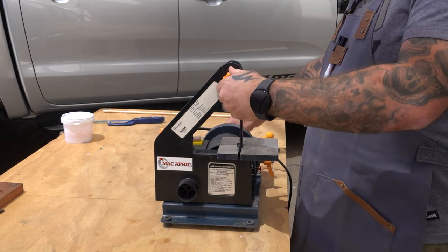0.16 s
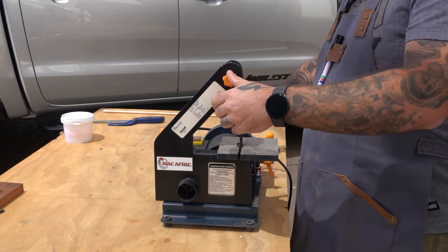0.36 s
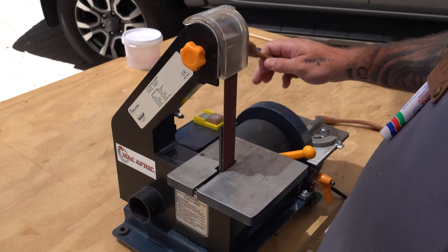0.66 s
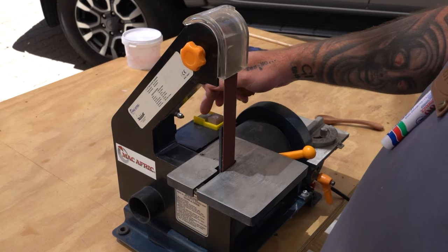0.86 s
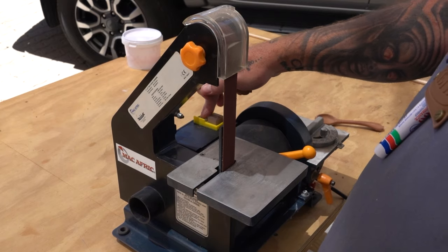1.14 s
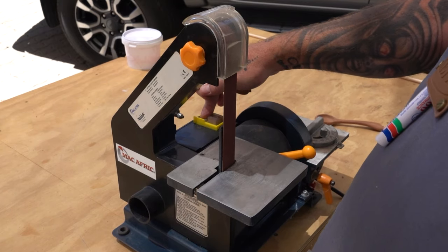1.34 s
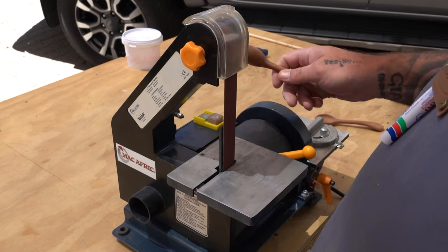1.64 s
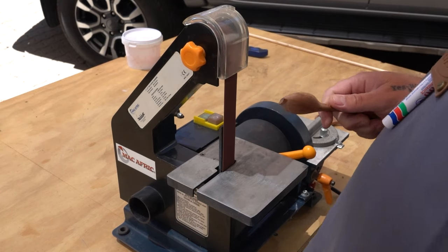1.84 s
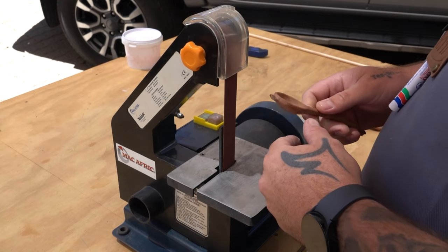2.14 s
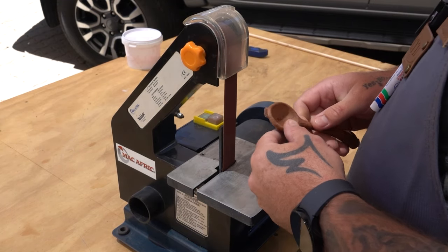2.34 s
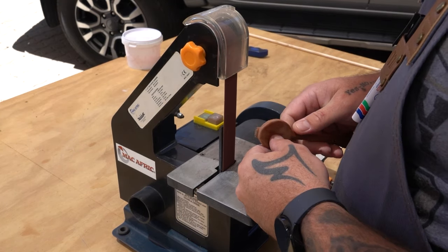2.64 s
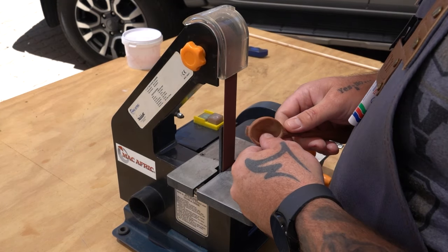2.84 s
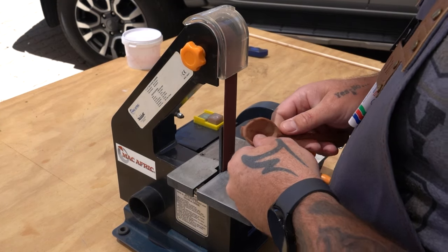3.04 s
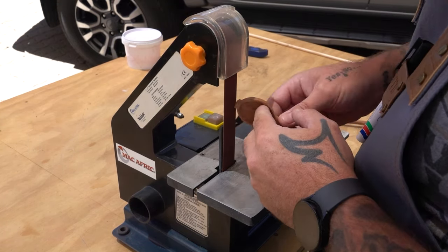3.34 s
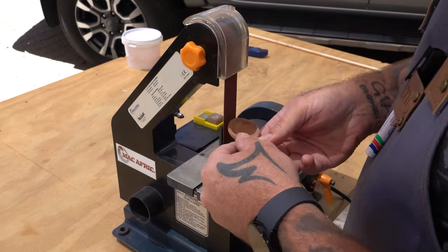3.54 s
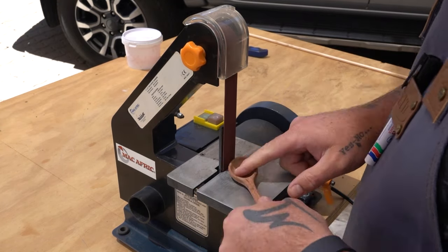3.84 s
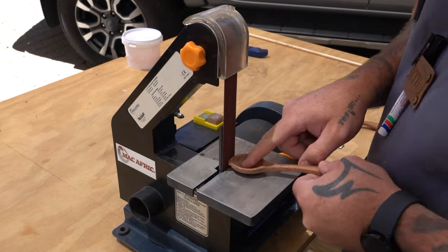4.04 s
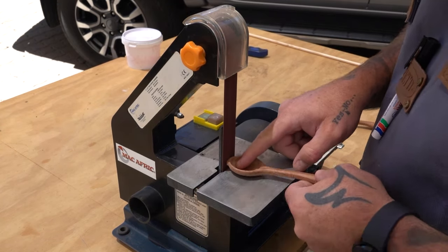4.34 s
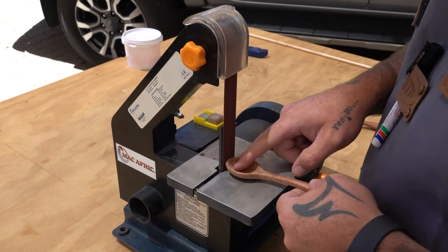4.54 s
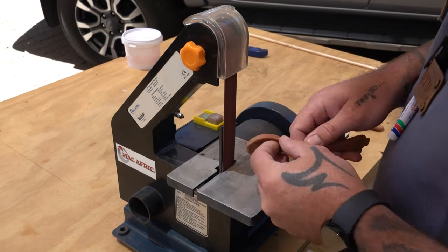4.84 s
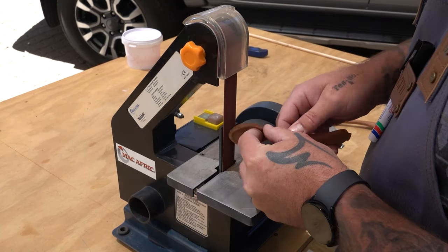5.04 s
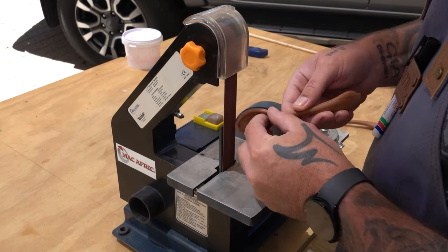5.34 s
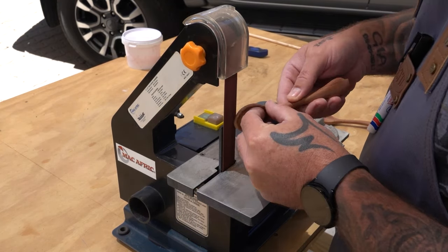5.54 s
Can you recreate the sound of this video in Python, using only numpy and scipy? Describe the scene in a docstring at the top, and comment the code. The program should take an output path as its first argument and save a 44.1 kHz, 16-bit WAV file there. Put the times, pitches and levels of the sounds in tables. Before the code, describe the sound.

A small belt sander bumps down outdoors, clicks on and runs up to a rattling hum, then jumps to a shrill fast-forward whistle with scuffing puffs.

```python
"""A swell of wind and a thin squeak in open air, then a small belt sander knocks on a wooden bench (ringing modes).
After a cut its switch clicks (resonated impulses) and it runs up: the belt joint thumps once a lap, the belt
hisses over its wheels (modulated noise) and the motor hums (sines). After a second cut all sounds as if run
twenty times fast: the hum is a high whine, and slow gusts of wind are short scuffing puffs of noise."""
import sys
import numpy as np
from scipy import signal
from scipy.fft import rfft, irfft, next_fast_len
from scipy.io import wavfile
from scipy.ndimage import map_coordinates

SR = 44100
rng = np.random.default_rng(int(sys.argv[2]) if len(sys.argv) > 2 else 0)


def wav_out(sig):
    """Save sig, one row per channel (or a flat mono array), as 16-bit PCM at SR to the path in sys.argv[1]."""
    wavfile.write(sys.argv[1], SR, np.round(np.clip(np.atleast_2d(sig).T, -1, 1) * 32767).astype(np.int16))


N = 250471

# the change of listening place, then the start of the fast-forward: time [s]
CUT_TIMES = [0.694, 3.0975]


def amp(db):
    """Decibels to amplitude gain: 20 dB is a factor of ten."""
    return 10 ** (np.asarray(db) / 20)


def unit(x):
    """Normalisation of x to an rms of 1."""
    return x / np.sqrt(np.mean(x ** 2) + 1e-20)


def clock():
    """Sampled time: the instant of every sample [s]."""
    return np.arange(N) / SR


def curves(rows):
    """Linear interpolation in time of each column after the first."""
    times, *columns = np.transpose(rows)
    return [np.interp(clock(), times, column) for column in columns]


def wobble(rate):
    """Slow random modulation: a spline through random knots, rate knots a second."""
    knots = rng.standard_normal(int(N * rate / SR) + 4)
    return map_coordinates(knots, [np.arange(N) * rate / SR])


def between(start, end, edge):
    """A gate open from start to end, with linear slopes edge seconds long."""
    return np.clip(np.minimum(clock() - start, end - clock()) / edge + .5, 0, 1)


def filtered(x, response):
    """Linear filtering: the spectrum of x times a complex response of frequency."""
    m = next_fast_len(N + SR // 2)
    return irfft(rfft(x, m) * response(np.fft.rfftfreq(m, 1 / SR)), m)[:N]


def coloured(x, spectrum):
    """Spectral shaping of x by (frequency [Hz], level [dB]) points, at rms 1."""
    f, db = np.transpose(spectrum)
    return unit(filtered(x, lambda hz: amp(np.interp(np.log(hz + 1), np.log(f + 1), db))))


def noise(spectrum):
    """Gaussian noise shaped to a spectrum, at rms 1."""
    return coloured(rng.standard_normal(N), spectrum)


def resonate(x, peaks):
    """Parallel second-order resonances of alternating sign: (centre [Hz], width [Hz], level [dB])."""
    def response(f):
        total = 0
        for k, (centre, width, db) in enumerate(peaks):
            damping = 1j * f * width
            total = total + (-1) ** k * amp(db) * damping / (centre * centre - f * f + damping)
        return total
    return filtered(x, response)


def dull(x, corner_hz):
    """Second-order low-pass: the treble of x rolls off above the corner."""
    return filtered(x, lambda f: 1 / (1 + 1j * np.sqrt(2) * f / corner_hz - (f / corner_hz) ** 2))


def fade(s, t60):
    """Exponential decay from time s, by 60 dB in t60 seconds."""
    age = clock() - s
    return (age >= 0) * amp(-60 * np.clip(age / t60, 0, 3))


def tone(hz):
    """Phase integration: a sine that follows a frequency curve."""
    return np.sin(2 * np.pi * (np.cumsum(hz * np.ones(N)) / SR + rng.random()))


def sander():
    """Periodic excitation: the belt drums on the frame, thumps at its joint and hisses over the wheels."""
    lap_hz, shaft_hz, idler_hz, mains_hz = 18.91, 46.7, 57.3, 50.1  # all but the mains at full speed
    start_s, run_up_s = 1.269, 0.49
    joint_at_s = 1.8235  # one pass of the belt joint
    rattle_full_db, rattle_growth_db = -35.5, 25.5  # gain at full speed, and its rise from standstill
    hiss_full_db, hiss_growth_db = -39.5, 37.5
    slow_hiss_hz = 5800  # the hiss of a slow belt rolls off above this
    whirr_db = -62.5  # the same at any speed
    # belt and shaft orders at full speed: (frequency [Hz], relative level [dB])
    order_lines = [(280, -59.5), (373, -61), (474, -46.5), (559.8, -45.5), (603, -50), (652.5, -63),
                   (682, -51), (700.4, -51.5), (719.4, -53.5), (757.5, -45), (814.5, -43), (833.5, -42.5),
                   (1003.5, -57), (1022.6, -45), (1060.5, -63)]
    # mains harmonics: (multiple of the mains [1], relative level [dB])
    hum_lines = [(2, -60), (4, -56.5)]
    # belt drumming on the frame: (frequency [Hz], relative density [dB per Hz])
    rattle_spectrum = [(70, -43), (160, -29), (240, -19.5), (300, -9.5), (400, -4), (470, 1.5), (720, -3.5),
                       (830, 3), (910, -5), (1000, -2.5), (1130, -17.5), (1270, -6.5), (1450, -12.5),
                       (1750, -8.5), (2300, -17.5), (4000, -64)]
    # belt grit: (frequency [Hz], relative density [dB per Hz])
    hiss_spectrum = [(900, -5), (1300, -3.5), (2200, -7), (3000, 3), (3300, -1.5), (4200, 0), (5600, -2.5),
                     (8200, -0.5), (9300, -5), (10300, -12), (11500, -8.5), (13000, -7), (14200, -12),
                     (15500, -17)]
    # resonances of guard and platen: (centre [Hz], width [Hz], relative level [dB])
    guard_peaks = [(1740, 470, -2.5), (2570, 97, 5), (2980, 104, 0.5), (3745, 34, 4), (4090, 180, 1),
                   (4927, 50, 7), (6730, 77, 0.5), (7800, 320, -4.5)]
    # resonances of the motor's casing: (centre [Hz], width [Hz], relative level [dB])
    casing_peaks = [(1780, 160, -2.5), (850, 180, -2)]

    speed = np.sin(np.pi / 2 * np.clip((clock() - start_s) / run_up_s, 0, 1))  # share of full speed
    rattle_db = rattle_full_db - rattle_growth_db * (1 - speed)
    hiss_db = hiss_full_db - hiss_growth_db * (1 - speed)
    travel = np.cumsum(speed) / SR
    travel -= np.interp(joint_at_s, clock(), travel)  # seconds of full-speed running since that pass
    lap = travel * lap_hz % 1

    # the belt's own unevenness comes round again on every lap
    surface = rng.standard_normal(int(SR / lap_hz))
    repeating = surface[(lap * len(surface)).astype(int) % len(surface)]
    flap = 1 + 0.16 * np.cos(2 * np.pi * (lap - .2))
    drive = (rng.standard_normal(N) + 0.52 * repeating) * flap * amp(2.3 * wobble(130))
    drumming = amp(-4.5 + 4.2 * (1.5 - speed)) * coloured(drive, rattle_spectrum)

    # the thick joint slaps the platen once a lap, some laps harder than others
    age = lap / lap_hz
    slap = age / .0015 * np.exp(1 - age / .0015) * np.sin(2 * np.pi * 660 * age)
    joint = 1.9 * speed ** 4 * amp(2 * wobble(19)) * slap

    # clear orders and hum only build up near full speed
    sway = speed * (1 + 0.00089 * wobble(4.9))
    orders = sum(amp(db + 37.0 + 0.75 * wobble(6.2)) * tone(hz * sway) for hz, db in order_lines)
    orders = flap * speed ** 8 * orders
    hum = speed ** 6 * sum(amp(db + 5.5 + 1.7 * wobble(14)) * tone(k * mains_hz) for k, db in hum_lines)

    # the idler wheel presses the belt once a turn; shaft and lap modulate the rub too
    idler_db = 1.22 * np.cos(2 * np.pi * idler_hz * travel)
    shaft_db = 0.27 * np.cos(2 * np.pi * shaft_hz * travel)
    lap_db = 0.44 * np.cos(2 * np.pi * lap)
    rub = amp(idler_db + shaft_db + lap_db + 0.75 * wobble(24.89))
    guard = unit(resonate(rng.standard_normal(N) + 0.59 * repeating, guard_peaks))
    slow_grit = dull(noise(hiss_spectrum), slow_hiss_hz)
    grit = speed ** 2 * noise(hiss_spectrum) + (1 - speed ** 2) * slow_grit
    hiss = rub * (amp(-1) * grit + amp(-6.0) * speed ** 3 * guard)

    whirr = amp(whirr_db) * unit(resonate(rng.standard_normal(N), casing_peaks))
    rattle = amp(rattle_db) * (drumming + joint + orders)
    return between(1.335, 9, edge=0.075) * (whirr + rattle + amp(hiss_db) * hiss + hum)


def fast_sander():
    """Frequency scaling: the sped-up hum is a whistle, the rattle a fizz with wavering rotation orders."""
    mains_hz, lap_hz, shaft_hz, rotor_hz = 1002, 379.45, 935.25, 989.4  # sped-up rates
    beat_hz = 174  # spacing of the side lines from each shaft line
    fizz_db, fizz_sag_db_per_s = -42.5, 0.03
    # mains harmonics: (multiple of the sped-up mains [1], relative level [dB])
    hum_lines = [(1, -75.5), (2, -63), (3, -78.5), (4, -58), (6, -83), (8, -63), (10, -64)]
    # drift of the machine's speed: (time [s], speed ratio [1])
    speed_drift = [(3.1, 0.9995), (3.6, 1.0001), (3.8, 0.9988), (4.4, 0.9992), (4.7, 1.0007),
                   (5.68, 1.0007)]
    # outline over the lap-rate multiples: (frequency [Hz], relative level of one line [dB])
    belt_outline = [(3400, -79), (4200, -85), (5000, -81), (5700, -71.5), (7200, -71), (8700, -67.5),
                    (11000, -63.5), (12300, -72), (13000, -58), (14000, -59), (14800, -64), (15200, -64),
                    (15600, -64)]
    # beating shaft lines: (multiple of the shaft rate [1], relative level [dB], lower side line [dB],
    # upper side line [dB])
    shaft_lines = [(2, -71.5, -104, -89), (4, -75, -95, -88), (6, -67, -87, -65.5), (8, -62, -77.5, -62),
                   (10, -57.5, -62, -65), (12, -55, -61.5, -61), (14, -59, -73, -67), (16, -59, -74, -67)]
    # rotor lines: (multiple of the rotor rate [1], relative level [dB])
    rotor_lines = [(3, -84), (4, -74), (8, -72), (16, -67)]
    # sped-up rattle: (frequency [Hz], relative density [dB per Hz])
    fizz_spectrum = [(300, -38.5), (1500, -24), (2600, -23), (3300, -26.5), (3500, -17), (4400, -17),
                     (5200, -22.5), (6800, -9.5), (7350, -11), (8000, -7.5), (9300, 1.5), (9650, -4),
                     (10300, -0.5), (11200, -1.5), (12500, -2.5), (13800, -5), (14200, -6), (15000, -3),
                     (15600, -0.5)]

    speed = curves(speed_drift)[0] * (1 + .0003 * wobble(14) + .0004 * wobble(150))
    hum = sum(amp(db + 3.0 + 0.49 * wobble(12)) * tone(mains_hz * k) for k, db in hum_lines)
    belt_hz = lap_hz * np.arange(9, 42)
    lines = list(zip(belt_hz, np.interp(belt_hz, *np.transpose(belt_outline))))
    for k, *levels in shaft_lines:
        for side, db in zip((0, -1, 1), levels):
            lines.append((k * shaft_hz + side * beat_hz, db))
    lines += [(k * rotor_hz, db) for k, db in rotor_lines]
    whine = sum(amp(db + 2.0 + 0.99 * wobble(2.96)) * tone(hz * speed) for hz, db in lines)
    sag_db = fizz_sag_db_per_s * (clock() - CUT_TIMES[1])
    fizz = amp(fizz_db - sag_db + 0.65 * wobble(60)) * noise(fizz_spectrum)
    return hum + whine + fizz


def switch():
    """Impact excitation: the plastic rocker snaps over, bounces and thuds into the housing."""
    # snap and bounces: (time [s], relative click level [dB], relative thud level [dB])
    click_times = [(1.297, -47, -51), (1.3064, -46, -29), (1.310, -62, -35), (1.3152, -59, -28),
                   (1.331, -74, -34), (1.386, -63, -70)]
    # resonances of the rocker: (centre [Hz], width [Hz], relative level [dB])
    rocker_peaks = [(1800, 300, -1.5), (2600, 420, -7), (3660, 530, 2), (5200, 1700, -8.5), (7350, 960, 0),
                    (8270, 500, 1), (12600, 2600, -24)]
    # resonances of the housing: (centre [Hz], width [Hz], relative level [dB])
    housing_peaks = [(207, 18, -10), (340, 24, -19.5), (403, 80, 2.5), (524, 106, -2), (834, 180, -7),
                     (1540, 74, -9), (1780, 100, -17)]
    snaps, thuds = np.zeros(N), np.zeros(N)
    for s, click_db, thud_db in click_times:
        snaps += amp(click_db) * (fade(s, 0.0082) + amp(-12.0) * fade(s, 0.07))
        thuds[round(s * SR)] = amp(thud_db + 34.5)
    clicks = amp(9.5) * resonate(snaps * rng.standard_normal(N), rocker_peaks)
    return clicks + dull(resonate(thuds, housing_peaks), corner_hz=4500)


def knocks():
    """Modal ringing: each bump is one short, dull push, then the frame and the bench ring."""
    # the sander bumps on the bench: (time [s], relative level [dB])
    bumps = [(0.397, -40), (0.409, -43), (0.6001, -21.5), (0.6093, -51)]
    # modes of the sander on its bench: (frequency [Hz], relative level [dB], t60 [s])
    frame_modes = [(382.5, -15, 0.51), (462, -7.5, 0.23), (636, 2.5, 0.11), (780, -15.5, 0.14),
                   (900, -15, .2), (963, -1, 0.13), (1050, -19, .13), (1370, 3, 0.033), (1550, -6, 0.12),
                   (2200, -14, 0.076)]
    bench_spectrum = [(80, -18), (250, -2), (400, 14), (1600, -1), (2300, -14), (8000, -34)]  # Hz, dB
    out, t = np.zeros(N), clock()
    for s, db in bumps:
        age = np.maximum(t - s, 0)
        ring = np.zeros(N)
        for hz, level, t60 in frame_modes:
            ring += amp(level + rng.normal(0, 1)) * fade(s, t60) * np.sin(2 * np.pi * hz * age)
        contact = (t - s - .0005) / .00022
        push = -contact * np.exp(-contact ** 2 / 2)
        bench = fade(s, 0.16) * noise(bench_spectrum)
        out += amp(db) * (amp(-12) * ring + amp(3.5) * push + amp(-11) * bench)
    band = signal.butter(3, [230, 2600], "bandpass", fs=SR, output="sos")
    return signal.sosfilt(band, out) * between(-1, CUT_TIMES[0], edge=.001)


def fingers():
    """Light friction: tiny bright ticks of decaying noise as fingers brush the housing."""
    # brushes: (time [s], level [dB])
    brushes = [(0.957, -69), (0.99, -64), (1.249, -67.5)]
    # their colour: (frequency [Hz], relative density [dB per Hz])
    tick_spectrum = [(1000, -6), (2000, 9), (8000, -2), (13000, -8), (15500, -10)]
    return sum(amp(db) * fade(s, 0.018) for s, db in brushes) * noise(tick_spectrum)


def fast_wind():
    """Time compression: sped-up gusts are puffs over a breeze, each its own mix of low thump and higher scuff."""
    breeze_scuff_db = -14  # the breeze's scuff relative to its thump, before the final mix
    edge_share, tail_db, tail_t60_s = 0.18, -17.5, 0.24  # slopes as a share of the gust; its wake
    # sped-up breeze between the gusts: (time [s], relative level [dB])
    breeze = [(3.1, -66), (3.43, -82), (3.57, -60.5), (3.86, -65.5), (3.96, -87), (4.09, -85), (4.17, -62),
              (5.03, -65), (5.68, -48.5)]
    # sped-up gusts: (start [s], length [s], relative thump level [dB], relative scuff level [dB])
    gust_times = [(3.273, 0.076, -63.5, -75), (3.626, 0.1, -57, -60), (4.113, 0.024, -50.5, -70),
                  (4.299, 0.073, -56, -76), (4.385, 0.011, -48, -54), (4.553, 0.014, -37, -48),
                  (4.568, 0.006, -27.5, -38), (4.611, 0.058, -48.5, -61), (4.662, 0.019, -31.5, -48.5),
                  (4.697, 0.073, -38, -48), (4.925, 0.021, -45.5, -69), (4.955, 0.011, -36, -53),
                  (5.08, 0.027, -45, -60), (5.154, 0.066, -44, -55), (5.239, 0.13, -49.5, -54.5),
                  (5.381, 0.09, -39, -45.5), (5.423, 0.017, -44.5, -43), (5.499, 0.029, -43, -52.5),
                  (5.589, 0.024, -37.5, -53.5), (5.615, 0.059, -47, -54.5), (5.637, 0.00595, -36, -44)]
    # low puff: (frequency [Hz], relative density [dB per Hz])
    thump_spectrum = [(25, -59), (60, -5.5), (110, 0.5), (180, 2.5), (350, -2), (550, -8), (750, -25.5),
                      (1300, -45.5)]
    # higher scuff: (frequency [Hz], relative density [dB per Hz])
    scuff_spectrum = [(350, -9), (680, 3), (1000, -4.5), (1500, -13), (2200, -18.5), (3500, -35),
                      (7000, -60)]
    thump = amp(curves(breeze)[0] + 2.5 * wobble(35))
    scuff = amp(breeze_scuff_db) * thump
    for start, length, thump_db, scuff_db in gust_times:
        end = start + length
        gust = between(start, end, edge=edge_share * length)
        thump += amp(thump_db) * (gust + amp(tail_db) * fade(end, tail_t60_s))
        scuff += amp(scuff_db) * gust
    eddies = unit(amp(3.2 * wobble(200)))
    puffs = eddies * (amp(-1.1) * thump * noise(thump_spectrum) + amp(-1.54) * scuff * noise(scuff_spectrum))
    return signal.sosfilt(signal.butter(3, 70, "highpass", fs=SR, output="sos"), puffs)


def outdoors():
    """Broadband ambience: open air, louder before the first cut, faint squeaks, and wind on the microphone."""
    wide_db, swell_db, close_db = -55, -28.5, -67  # still air; share of the wind it adds; air after the cut
    buffet_db = -57.5  # light wind on the microphone between swells
    rise_db_per_s, sag_hz_per_s, quaver_hz = 220, 500, 64.8  # of the squeaks; quaver scales two wobbles
    # open air before the first cut: (frequency [Hz], relative density [dB per Hz])
    wide_spectrum = [(59, -22), (100, 5), (134, -5), (243, -1), (293, -6.5), (362, -3), (403, -4),
                     (487, -5), (861, -5), (1960, -13.5), (4500, -21), (8500, -22), (10000, -33),
                     (15500, -39)]
    # open air after it: (frequency [Hz], relative density [dB per Hz])
    close_spectrum = [(59, -48), (100, -22), (140, -6), (313, -8.5), (355, -11.5), (429, -12), (614, -10),
                      (1260, -9.5), (2040, -22.5), (2630, -25.5), (2870, -27), (15500, -44.5)]
    # wind on the microphone: (frequency [Hz], relative density [dB per Hz])
    rumble_spectrum = [(5, -1), (12, 1), (25, -23.5), (50, -21), (100, -42), (250, -70), (600, -110)]
    # wind swells: (peak time [s], half width at 1/e [s], level [dB])
    swells = [(0.05, 0.083, -30.5), (0.45, 0.4, -42), (1.55, 0.26, -43)]
    # thin squeaks: (peak time [s], frequency there [Hz], level [dB], t60 [s])
    squeak_times = [(0.09, 2690, -52.5, 0.7), (0.524, 4580, -62, 0.7), (0.566, 3530, -65, 0.5),
                    (0.82, 2650, -76, 0.9)]
    wide = between(-1, CUT_TIMES[0], edge=.001)
    wind = amp(buffet_db) + sum(amp(db) * np.exp(-((clock() - s) / width) ** 2) for s, width, db in swells)
    air = wide * (amp(wide_db) + amp(swell_db) * wind) * noise(wide_spectrum)
    air += (1 - wide) * amp(close_db) * noise(close_spectrum)
    squeaks = np.zeros(N)
    for s, hz, db, t60 in squeak_times:
        age = clock() - s
        swell = amp(db + np.minimum(rise_db_per_s * age, -60 * age / t60))
        place = wide if s < CUT_TIMES[0] else 1 - wide
        quaver = quaver_hz * (wobble(300) + wobble(45))
        squeaks += place * swell * tone(hz - sag_hz_per_s * age + quaver)
    return air + squeaks + wind * noise(rumble_spectrum)


def scene():
    """Superposition: real time up to the second cut, fast-forward after it; both channels alike."""
    real_time = between(-1, CUT_TIMES[1], edge=.001)
    normal = sander() + switch() + knocks() + fingers() + outdoors()
    fast = fast_sander() + fast_wind()
    mono = real_time * normal + (1 - real_time) * fast
    return np.array([mono, mono])


def record(dry):
    """Band limiting: nothing is kept from 15780 Hz upwards."""
    return np.array([filtered(side, lambda hz: hz < 15780) for side in dry])


dry = scene()
out = record(dry)
wav_out(out)
```